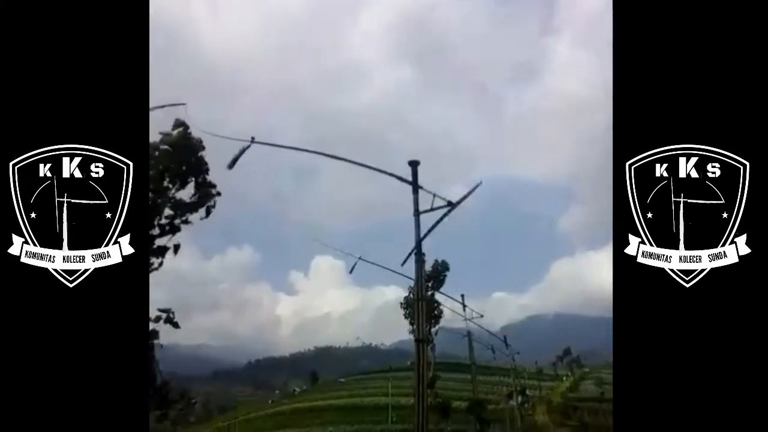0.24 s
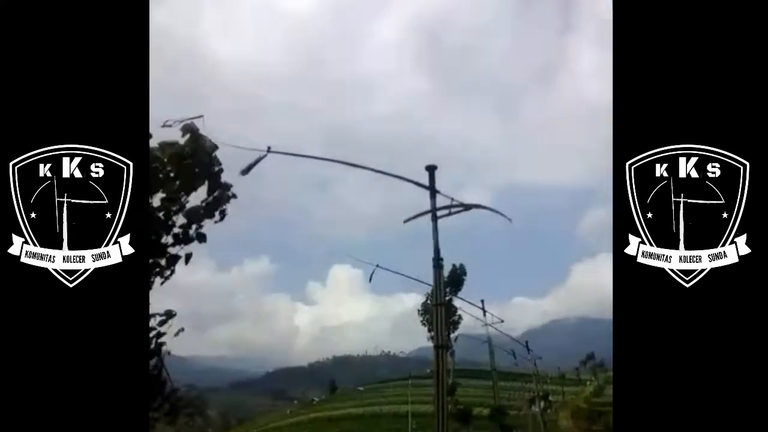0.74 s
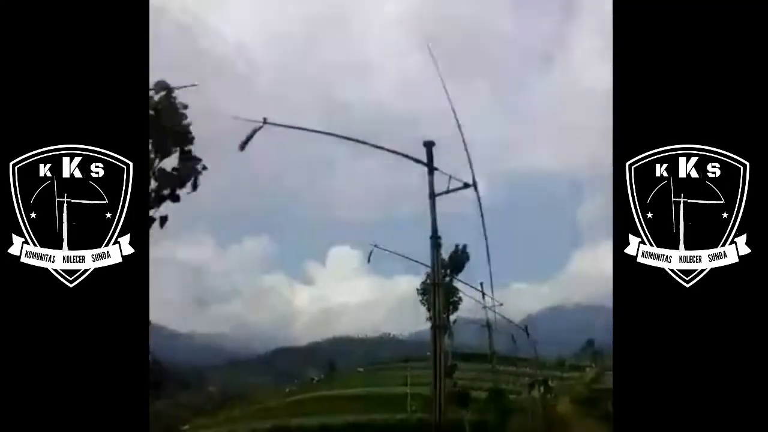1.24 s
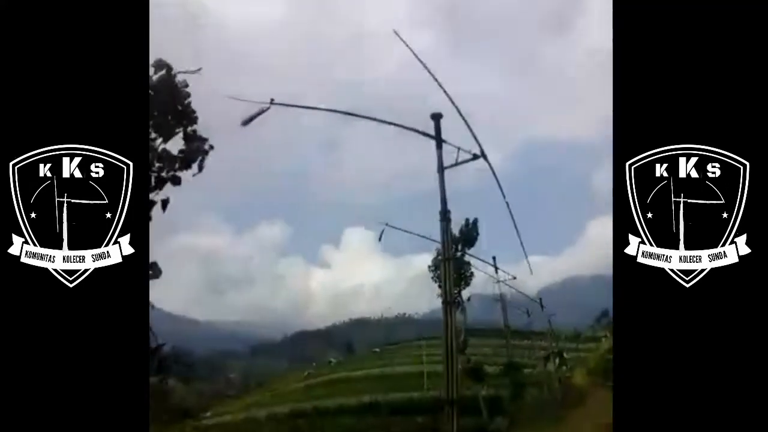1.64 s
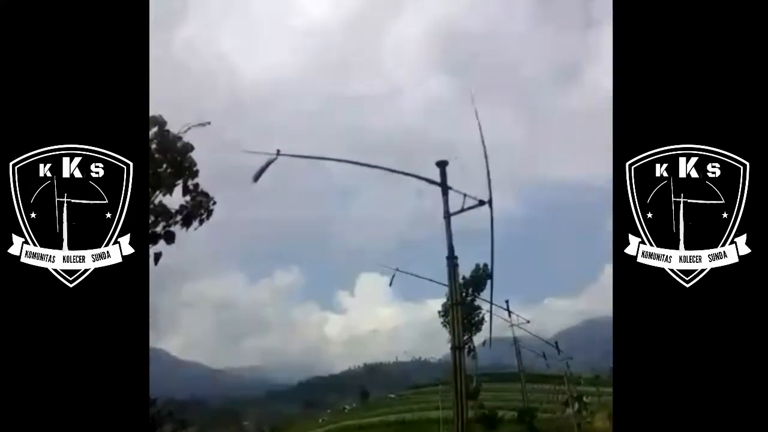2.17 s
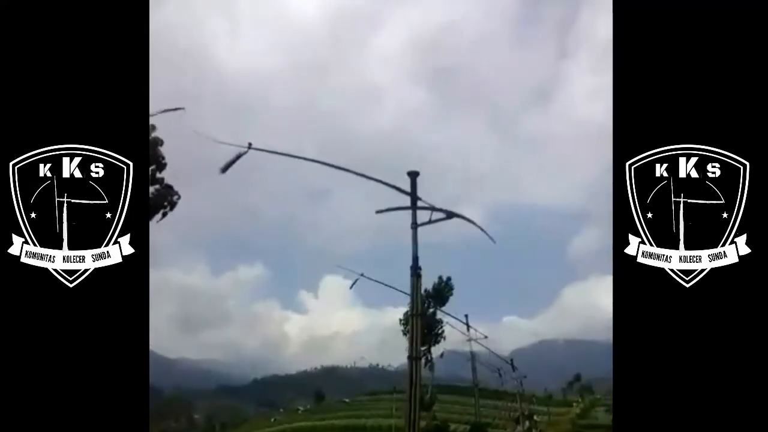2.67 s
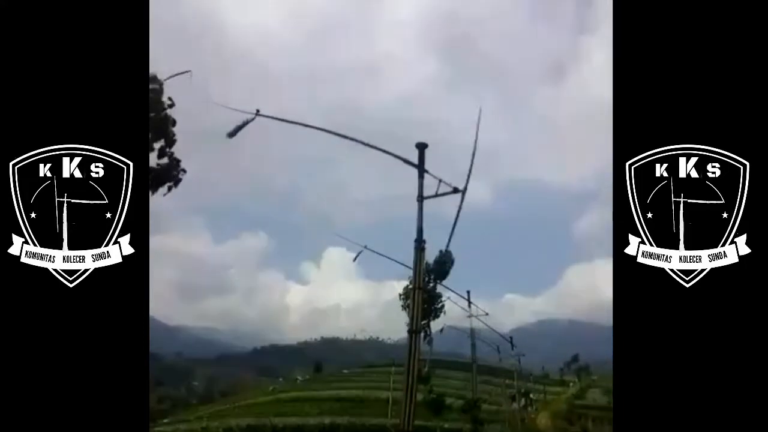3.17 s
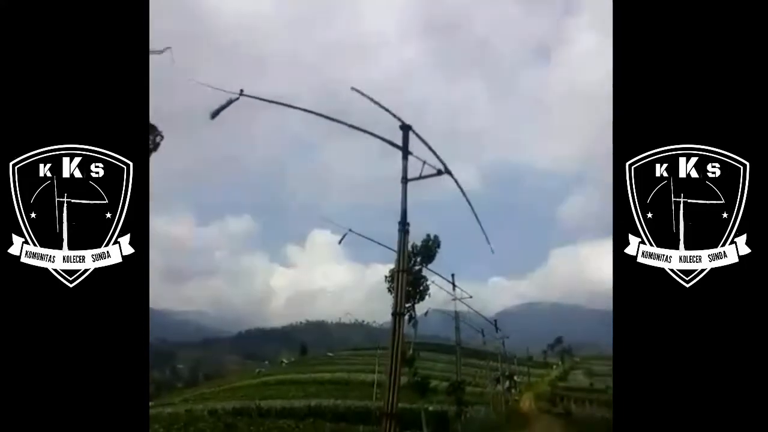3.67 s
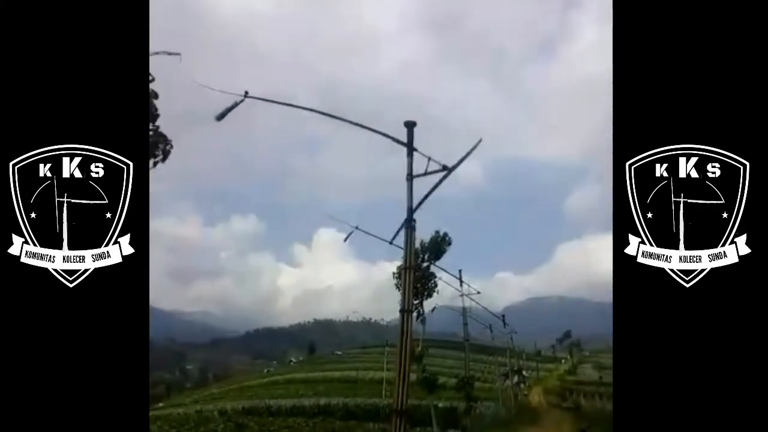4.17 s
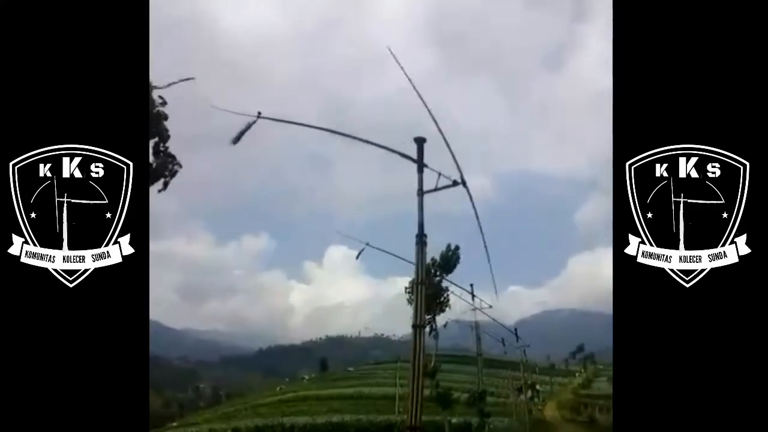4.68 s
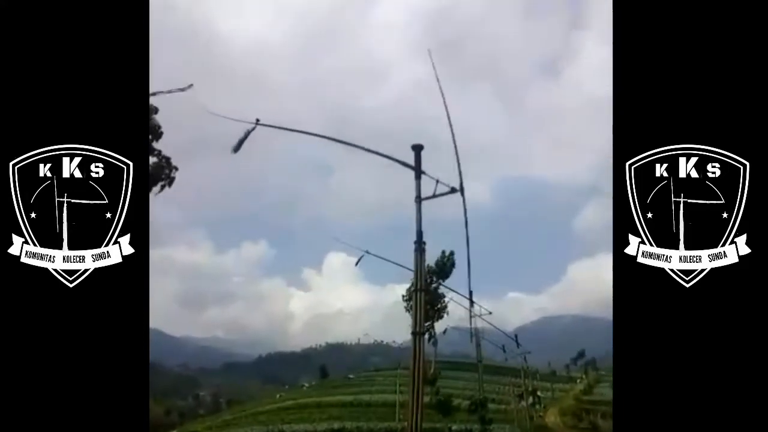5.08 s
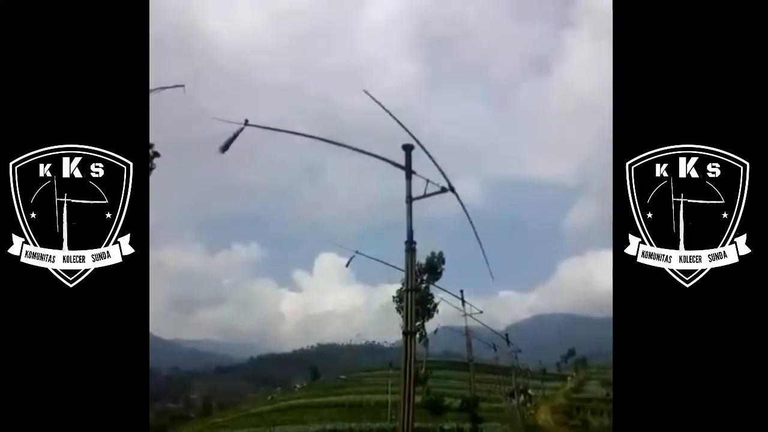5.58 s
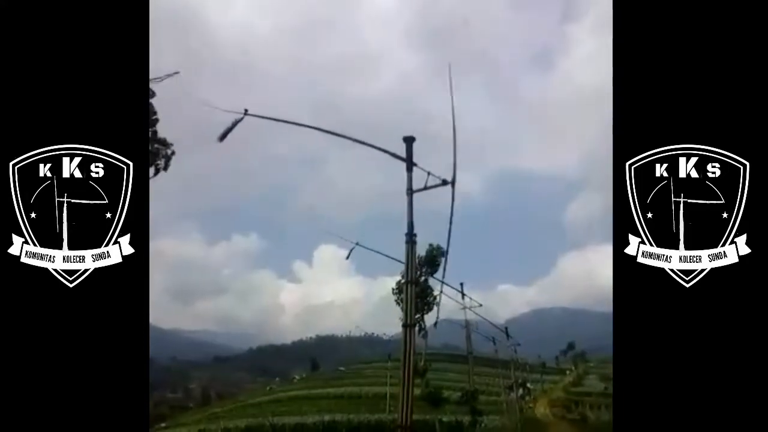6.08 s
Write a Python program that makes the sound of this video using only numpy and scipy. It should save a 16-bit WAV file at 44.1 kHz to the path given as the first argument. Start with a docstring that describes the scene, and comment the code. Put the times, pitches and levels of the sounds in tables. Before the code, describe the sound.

An exposed microphone in open, windy fields picks up about 6.3 seconds of continuous wind and a propeller turning on a tall pole. From the start, quick breathy swishes repeat about seven and a half times a second, each swelling and dropping off fast, with slightly differing blades. Low lumpy rumble lies over them, with a cluster of sharp-edged thumps near 0.6-0.75 s, then a calmer stretch. Dull buffets return from 1.4 s and thicken around 2-2.3 s; the swishes slow to just under seven a second and grow fainter. More bumps come near 2.9 s. From 3.6 s the wind turns violent, with distorted, flattened thumps at 3.74, 4.16 and strongest at 4.52 s, staying rough until about 5 s. It eases around 5.2-5.5 s, then bumps again near 6 s. Smooth air rush and faint hiss run beneath, dipping slightly after the hardest gusts, and everything continues to the end.

```python
"""A two-bladed wooden propeller spins on a tall pole over open fields: edge noise swells and drops at each pass.
Gusty wind buffets the microphone port: bands of noise lurch together as a lumpy rumble, and eddies
add thumps, short pressure swings that overload the input. A smooth rush of air and hiss, steady noise,
lies beneath. The recorder's gain control ducks the swish and the hiss after the strongest gusts."""
import sys
import numpy as np
from scipy import signal
from scipy.io import wavfile
from scipy.ndimage import uniform_filter1d, minimum_filter1d

SR = 44100
rng = np.random.default_rng(int(sys.argv[2]) if len(sys.argv) > 2 else 0)


def output_pcm(signal):
    """Save a mono or channel-first signal as 16-bit PCM at the path in sys.argv[1].

    Samples are clipped to [-1, 1] before scaling.
    """
    pcm = np.clip(np.atleast_2d(signal).T, -1, 1) * 32767
    wavfile.write(sys.argv[1], SR, np.round(pcm).astype(np.int16))


N = 278712


def from_db(db):
    """Decibel law: 20 dB is a tenfold amplitude."""
    return 10 ** (np.asarray(db) / 20)


def rms_one(x):
    """Power normalisation: scale to a root mean square of 1."""
    return x / np.sqrt(np.mean(x ** 2) + 1e-20)


def at_hz(points, hz):
    """Spectral envelope: dB read along a logarithmic frequency axis, -70 outside the points."""
    point_hz, point_db = np.array(points).T
    return np.interp(np.log(hz), np.log(point_hz), point_db, left=-70, right=-70)


def drift(corner_hz):
    """Low-pass random fluctuation: noise at every 40th sample through two equal poles; spread 1."""
    step = 40
    r = np.exp(-2 * np.pi * step * corner_hz / SR)
    white = rng.standard_normal(N // step + 2002)
    slow = signal.lfilter([1], [1, -2 * r, r * r], white)[2000:]   # the filter has settled
    return np.interp(np.arange(N) / step, np.arange(len(slow)), rms_one(slow))


def bands(first_hz, count, per_octave=2):
    """Filter-bank analysis: yields centre Hz and noise of each band; neighbours are unrelated."""
    white = rng.standard_normal((2, N + 8000))
    for k in range(count):
        low = first_hz * 2 ** (k / per_octave)
        high = first_hz * 2 ** ((k + 1) / per_octave)
        sos = signal.butter(2, [low, high], "band", fs=SR, output="sos")
        yield np.sqrt(low * high), signal.sosfilt(sos, white[k % 2])[-N:]


# Strength of the wind on the microphone port. Each row: time in seconds, relative rumble level in dB,
# flutter above the rumble in dB.
WIND_GUSTS = [(0.0, -14, -15), (0.46, -24, -11.5), (0.599, -25.5, -5.5), (0.63, -11.5, -7),
              (0.7, -17, -11.5), (0.86, -21.5, -7), (1.07, -13, -20.5), (1.27, -26, -9.5), (1.53, -19, -13),
              (1.56, -12.5, -18), (1.68, -18.5, -16), (2.14, -19, -13.5), (2.252, -9.5, -7.5),
              (2.29, -18, -12.5), (2.5, -24.5, -21.5), (2.78, -17, -19.5), (2.841, -28.5, -21),
              (2.859, -15, -10.5), (3.1, -17.5, -10), (3.38, -21, -14), (3.41, -27.5, -20),
              (3.541, -23.5, -10), (3.58, -8.5, -17.5), (3.63, -26.5, -11), (3.659, -10, -4.5),
              (3.75, -8.5, -11), (3.86, -22, -15), (3.97, -22.5, -13.5), (4.03, -12, -10.5),
              (4.26, -16, -5.5), (4.35, -5, -13.5), (4.43, -13, 0), (4.65, -9.5, -6.5),
              (4.71, -20.5, -10.5), (4.82, -9.5, -8.5), (5.1, -13, -11.5), (5.16, -30, -14),
              (5.189, -15, -31), (5.24, -26, -13), (5.37, -9.5, -16), (5.46, -22.5, -13.5),
              (5.58, -11.5, -13.5), (5.72, -22.5, -18), (5.78, -36, -21), (5.87, -17, -20),
              (5.908, -11, -12.5), (6.21, -15.5, -12), (6.32, -17, -18)]
# Colour of the wind at the reference flutter. Each row: frequency in Hz, relative density in dB per Hz.
WIND_COLOUR = [(12, -49), (20, -17.5), (92, 3), (145, 3), (313, -10.5), (552, -23.5), (1030, -88),
               (1600, -46), (2080, -73), (3520, -120)]
FLUTTER_REFERENCE_DB = -9   # flutter at which the wind has the colour above


def buffet(lumpy_db, own_db):
    """Turbulent pressure on the port: all bands lurch together, the upper ones more; flutter tilts the colour."""
    s, rumble_db, flutter_db = np.transpose(WIND_GUSTS)
    t = np.arange(N) / SR
    rumble = np.interp(t, s, rumble_db)
    flutter = np.interp(t, s, flutter_db) - FLUTTER_REFERENCE_DB
    # the deepest eddies are large and follow the gusts slowly: smoothed over 0.2 s
    smoothing = uniform_filter1d(rumble, int(.2 * SR)) - rumble
    lumps, out = drift(30.4), 0
    for hz, noise in bands(20, count=13):
        upper = np.clip(np.log2(hz / 170) / 1.08, 0, 1.3)
        deep = np.clip(np.log2(95 / hz) * 0.16, 0, 1)
        gust_db = upper * flutter + deep * smoothing
        chance_db = lumpy_db * (0.64 + upper) * lumps + own_db * drift(19)
        out = out + from_db(at_hz(WIND_COLOUR, hz) + gust_db + chance_db) * noise
    return from_db(rumble + 2.0) * rms_one(out)


# Steady wind rush over the fields and microphone hiss. Each row: frequency in Hz,
# relative density in dB per Hz.
RUSH_COLOUR = [(150, -8), (250, -0.5), (400, 0.5), (700, -11), (1100, -5.5), (1700, -8.5), (2600, -6.5),
               (4400, -17), (7300, -19.5), (13900, -20)]
AIR_DB = -46.5   # rms level ahead of the recorder


def air(patchy_db):
    """Broadband noise: a smooth rush under the swishes, each band drifting a little."""
    out = 0
    for hz, noise in bands(160, count=20, per_octave=3):
        band_db = at_hz(RUSH_COLOUR, min(hz, 13000)) + patchy_db * drift(9.7)
        out = out + from_db(band_db) * noise
    return from_db(AIR_DB) * rms_one(out)


# Speed of the propeller. Each row: time in seconds, rate in turns per second.
TURN_RATE = [(0, 3.808), (0.9, 3.754), (1.7, 3.62), (2.05, 3.502), (4.2, 3.42), (4.6, 3.375), (5.1, 3.486),
             (6.32, 3.452)]
# Strength of the swishes. Each row: time in seconds, relative peak level in dB.
SWISH_LEVEL = [(0, -37.5), (.8, -36), (1.7, -36.5), (2.25, -40.5), (2.55, -38), (3.4, -40.5), (3.8, -40),
               (4.15, -43.5), (4.75, -37), (6.32, -40)]
FIRST_PASS_TURNS = 0.078
BLUNT_OFFSET_DB, PASS_SPREAD_DB = -0.3, 0.28   # offset of the blunt blade, spread from pass to pass


def passes():
    """Blade-passing rate: one pass every half turn, blunt and sharp in turn; rows of s and relative peak dB."""
    t = np.arange(N) / SR
    turns = np.cumsum(np.interp(t, *np.transpose(TURN_RATE))) / SR
    s = np.interp(np.arange(FIRST_PASS_TURNS, turns[-1], .5), turns, t)
    spread = PASS_SPREAD_DB * rng.standard_normal(64)[:len(s)]
    db = np.interp(s, *np.transpose(SWISH_LEVEL)) + spread
    db[0::2] += BLUNT_OFFSET_DB
    return np.transpose([s, db])


RISE_S, FALL_S = 0.05, 0.02   # Gaussian widths before and after the peak


def sweep(rows, lead_s):
    """Amplitude modulation: a blade swells as it comes round and drops fast once it has passed."""
    t, out = np.arange(0, N + 64, 64) / SR, 0   # every 64th sample is fine enough
    for s, peak_db in rows:
        late = t - s + lead_s
        width = np.where(late < 0, RISE_S, FALL_S)
        out = out + from_db(peak_db) * np.exp(-(late / width) ** 2 / 2)
    return np.interp(np.arange(N) / SR, t, out)


# Swish colours of the two blades. Each row: frequency in Hz, relative density in dB per Hz.
BLUNT_COLOUR = [(700, -7), (1300, -6), (1900, 2), (2400, 2.5), (3000, 3.5), (3600, -21.5), (4400, -14),
                (6000, -18), (7500, -23), (13500, -26.5)]
SHARP_COLOUR = [(700, -12), (1300, -7), (1900, 0), (2400, 1.5), (3000, 3), (3600, -18), (4400, -10.5),
                (6000, -13), (7500, -24.5), (13500, -24)]
LEAD_S_PER_OCTAVE = 0.0045   # how much earlier each higher octave peaks


def propeller(ragged_db):
    """Edge noise of both blades: treble peaks a little before the lower part, so each swish falls."""
    out, rows = 0, passes()
    for hz, noise in bands(700, count=13, per_octave=3):
        lead_s = LEAD_S_PER_OCTAVE * np.log2(hz / 2500)
        blunt = from_db(at_hz(BLUNT_COLOUR, hz)) * sweep(rows[0::2], lead_s)
        sharp = from_db(at_hz(SHARP_COLOUR, hz)) * sweep(rows[1::2], lead_s)
        out = out + (blunt + sharp) * from_db(ragged_db * drift(21)) * noise
    return from_db(6.0) * out


def push(hz, t):
    """Damped oscillation: a pressure swing of about one cycle round t = 0, dying more slowly than it came."""
    cycles = t * hz
    width = np.where(cycles < 0, .45, .7)
    return np.sin(2 * np.pi * cycles + 0.94) * np.exp(-(cycles / width) ** 2)


EDDIES_PER_S, EDDY_OVER_RUMBLE_DB, EDDY_SPREAD_DB = 14, 3, 1   # above the rumble column of the gusts
EDDY_LOW_HZ, EDDY_HIGH_HZ, EDDY_EDGE_DB = 176, 346, -47   # so faint an edge leaves them dull


def eddies():
    """Random shedding: lesser eddies at chance times, as strong as the gust they ride on; rows as for thumps."""
    s, rumble_db, _ = np.transpose(WIND_GUSTS)
    when, pitch, size = rng.random((round(EDDIES_PER_S * N / SR), 3)).T
    when = .02 + when * (N / SR - .04)   # clear of both ends
    spread_db = EDDY_SPREAD_DB * (2 * size - 1)
    peak_db = np.interp(when, s, rumble_db) + EDDY_OVER_RUMBLE_DB + spread_db
    hz = EDDY_LOW_HZ * (EDDY_HIGH_HZ / EDDY_LOW_HZ) ** pitch
    return list(zip(when, peak_db, hz, np.full(len(hz), EDDY_EDGE_DB)))


# The strongest eddies bursting on the port. Each row: crest time in seconds, relative peak level in dB,
# pitch in Hz, sharp edge against the push in dB.
STRONG_EDDIES = [(0.623, -3, 300, -12), (0.639, -13, 234, -27), (0.652, -0.5, 206, -10),
                 (0.679, -4, 243, -15), (0.739, -4, 256, -28), (1.436, -8, 200, -30),
                 (1.556, 0.5, 149, -16), (1.779, -3.5, 326, -38), (1.915, -8, 226, -40),
                 (1.95, -5.5, 160, -35), (2.041, -5.5, 276, -45), (2.065, -4, 220, -35),
                 (2.122, -7.5, 200, -28), (2.175, -12, 233, -12), (2.199, -13, 222, -10),
                 (2.216, 1.5, 204, -23), (2.256, 0, 325, -39), (2.324, -4.5, 196, -40),
                 (2.86, 2.5, 157, -13.5), (2.887, -4, 214, -36), (2.913, -9.5, 337, -26),
                 (2.929, -3, 203, -40), (2.968, -4, 256, -26), (2.994, -5, 272, -28),
                 (3.072, -3.5, 262, -10), (3.099, -5, 266, -33), (3.174, -2.5, 260, -39),
                 (3.25, -4.5, 237, -37), (3.343, -6.5, 217, -39), (3.451, -3, 272, -36),
                 (3.573, 0, 223, -12), (3.665, 1, 278, -33), (3.691, -4.5, 333, -8.5), (3.727, -6, 257, -9),
                 (3.738, 10.5, 185, -8.5), (3.756, 0, 298, -5), (3.918, -7.5, 270, -23),
                 (3.994, -6, 260, -30), (4.033, 0.5, 197, -26), (4.072, -0.5, 383, -28),
                 (4.157, 9.5, 254, -8.5), (4.196, -2, 272, -8), (4.225, -6.5, 306, -22),
                 (4.312, -6, 219, -22), (4.325, -8.5, 304, -5), (4.373, -11, 322, -3), (4.412, 0, 326, -10),
                 (4.448, -1, 268, -13), (4.464, -2, 423, -18), (4.505, -4, 273, -3),
                 (4.523, 13.5, 252, -12), (4.556, -2.5, 261, -10), (4.605, 1, 231, -23),
                 (4.63, -1, 259, -18), (4.659, 2, 275, -23), (4.738, 2, 170, -32), (4.792, 0.5, 330, -25),
                 (4.826, 0.5, 246, -10.5), (4.847, 5, 297, -8), (4.964, -1, 244, -32),
                 (5.012, 1.5, 280, -16), (5.056, -3.5, 247, -20), (5.333, -5.5, 268, -23),
                 (5.351, -6, 202, -31), (5.192, -8, 169, -37), (5.504, -11, 190, -24),
                 (5.556, -5, 158, -25), (5.611, -2.5, 177, -13.5), (5.909, -0.5, 237, -9),
                 (5.957, -1, 299, -10), (5.98, -6, 285, -11), (5.997, 3.5, 183, -8.5),
                 (6.082, -4, 251, -9.5), (6.158, -3, 230, -19), (6.284, -3.5, 158, -30)]
EDGE_HZ = 726
SNAP_HZ, SNAP_DB = 1500, -12   # the edge's brightest part, against the edge


def thumps():
    """Pressure impulses: each eddy is a low push; strong ones may carry a sharp edge, lesser ones sound dull."""
    rows = list(STRONG_EDDIES) + eddies()
    out, signs = np.zeros(N), rng.choice([-1, 1], len(rows))
    around = np.arange(-400, 800)   # samples from the crest
    t = around / SR
    edge = push(EDGE_HZ, t) + from_db(SNAP_DB) * push(SNAP_HZ, t)
    for (s, peak_db, hz, edge_db), sign in zip(rows, signs):
        pulse = sign * (push(hz, t) + from_db(edge_db) * edge)
        out[round(s * SR) + around] += from_db(peak_db) * pulse
    return out


def scene():
    """Superposition: wind, propeller and air add at the microphone, in one channel."""
    wind = buffet(lumpy_db=3.5, own_db=1.12) + thumps()
    return (wind + propeller(ragged_db=2.6) + air(patchy_db=1.5))[None]


BASS_CUT_HZ, TREBLE_CUT_HZ = 36.7, 13990
KNEE_DB, RATIO = -3.5, 0.13   # RATIO is dB of gain lost per dB held above the knee
ATTACK_S, RELEASE_DB_PER_S = 0.0097, 9   # the release is the fall of the held excess
CLIP_TOP, CLIP_HARDNESS = .73, 9
LIMITER_S, LIMITER_HEADROOM = 0.0013, 1.3


def record(dry):
    """Dynamic range compression: bass cut, gain ducking, a quick limiter, flattened tops and treble cut."""
    x = signal.sosfilt(signal.butter(2, BASS_CUT_HZ, "high", fs=SR, output="sos"), dry)
    # gain drops after loud peaks and creeps back
    ramp = RELEASE_DB_PER_S * np.arange(N) / SR
    over_db = np.maximum(20 * np.log10(np.abs(x) + 1e-9) - KNEE_DB, 0)
    held_db = np.maximum.accumulate(over_db + ramp, axis=1) - ramp
    r = np.exp(-1 / (ATTACK_S * SR))
    duck_db = RATIO * signal.lfilter([1 - r], [1, -r], held_db)
    x = x * from_db(-duck_db) / CLIP_TOP
    # the limiter looks about a millisecond each way and lets peaks only just past the top
    span = int(LIMITER_S * SR)
    allowed = np.minimum(1, LIMITER_HEADROOM / (np.abs(x) + 1e-9))
    x = x * uniform_filter1d(minimum_filter1d(allowed, span), span)
    x = CLIP_TOP * x / (1 + np.abs(x) ** CLIP_HARDNESS) ** (1 / CLIP_HARDNESS)
    return signal.sosfilt(signal.ellip(14, .1, 60, TREBLE_CUT_HZ, fs=SR, output="sos"), x)


dry = scene()
out = record(dry)
output_pcm(out)
```